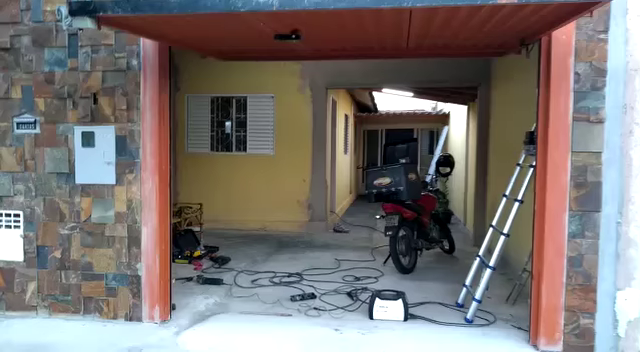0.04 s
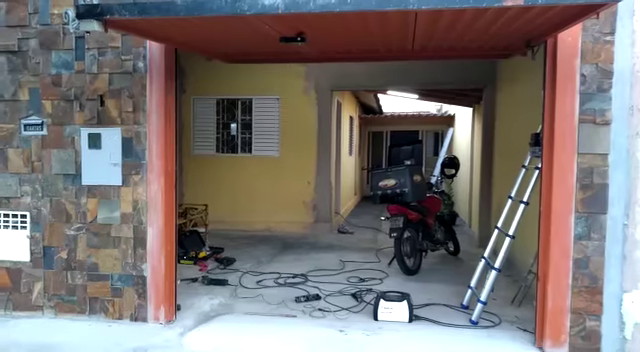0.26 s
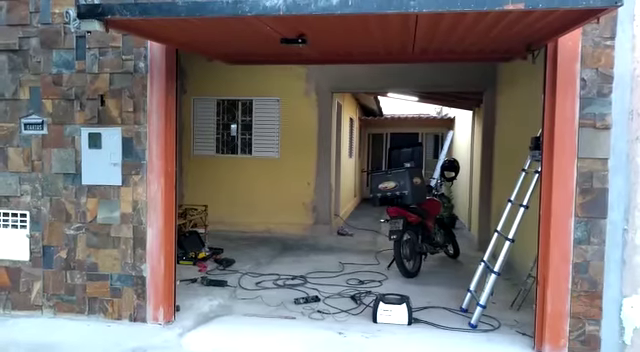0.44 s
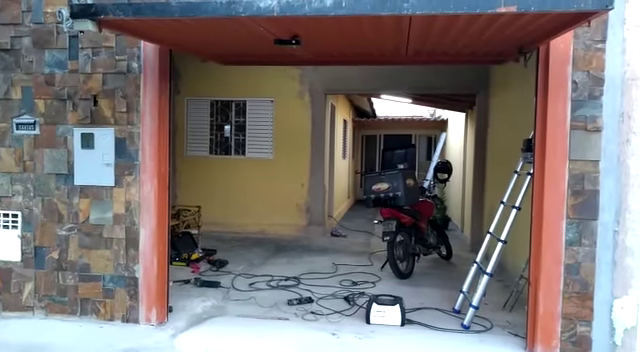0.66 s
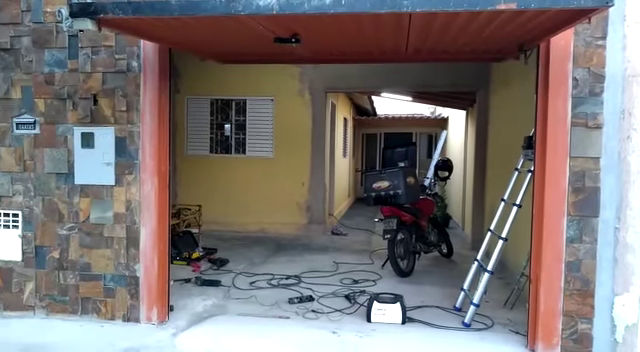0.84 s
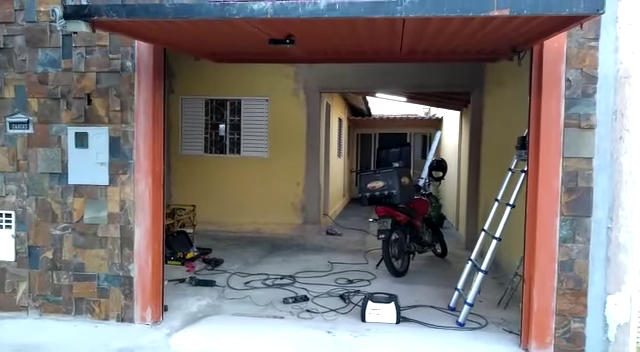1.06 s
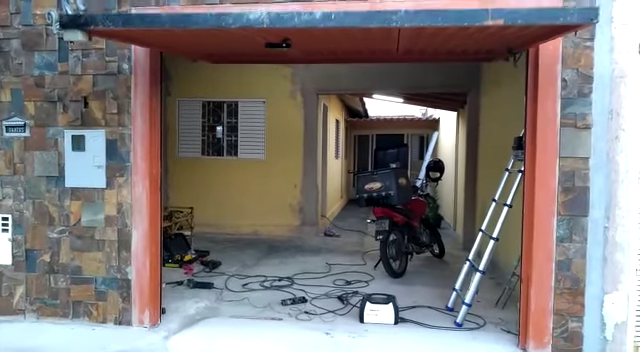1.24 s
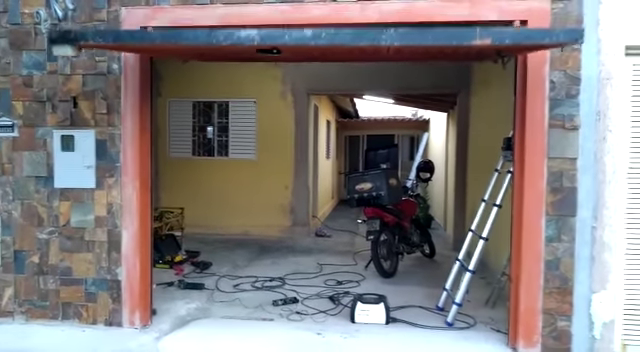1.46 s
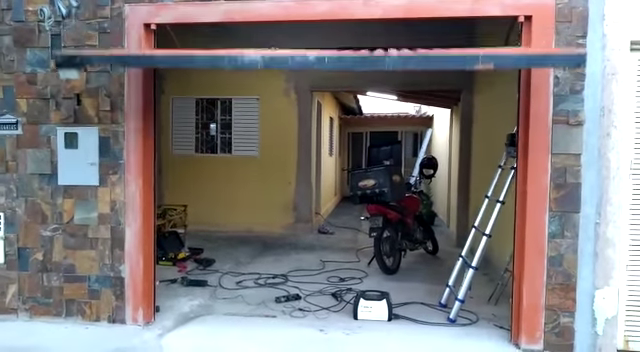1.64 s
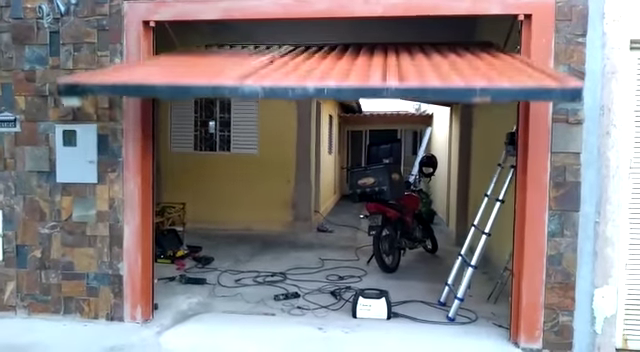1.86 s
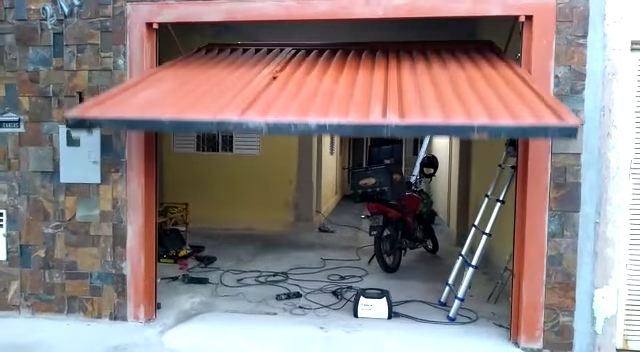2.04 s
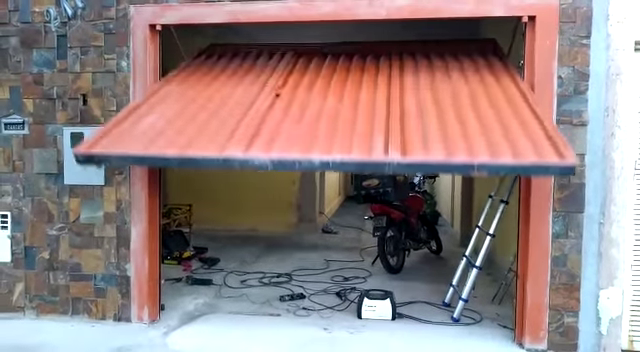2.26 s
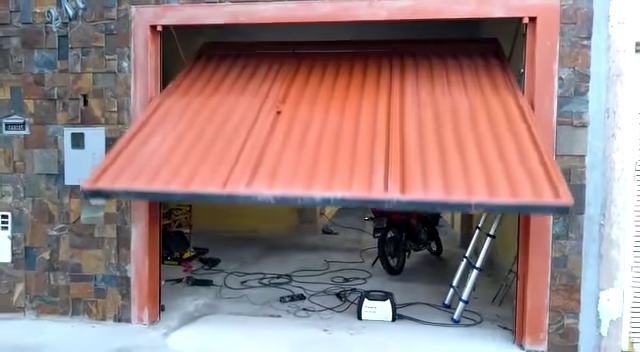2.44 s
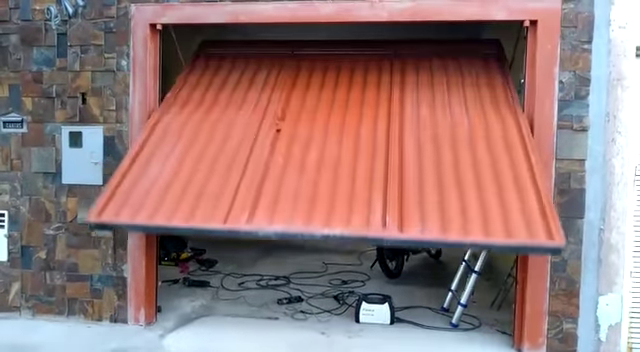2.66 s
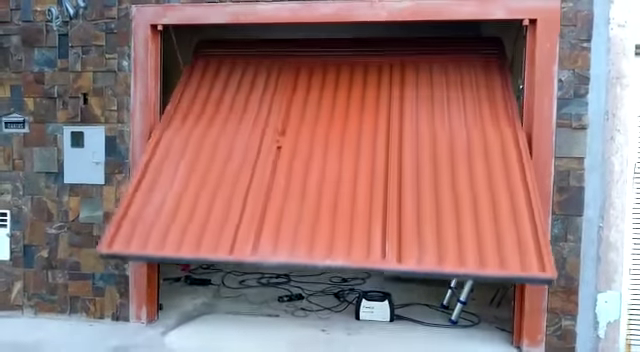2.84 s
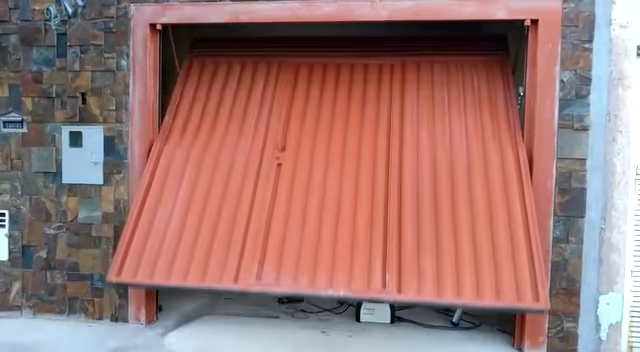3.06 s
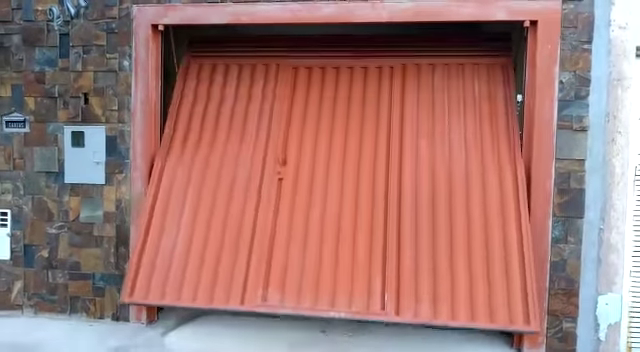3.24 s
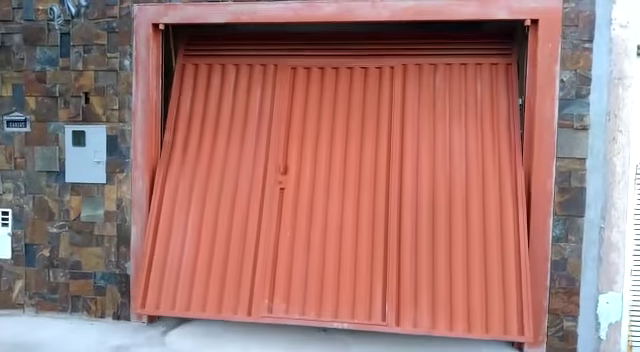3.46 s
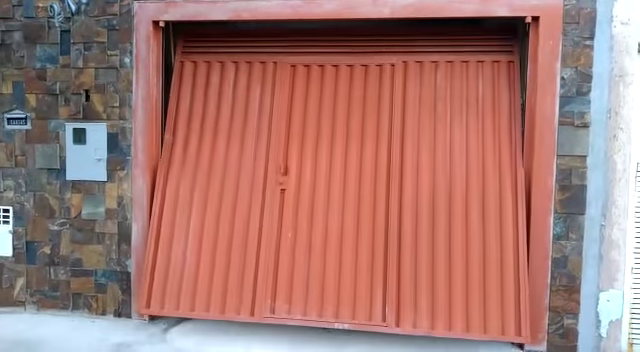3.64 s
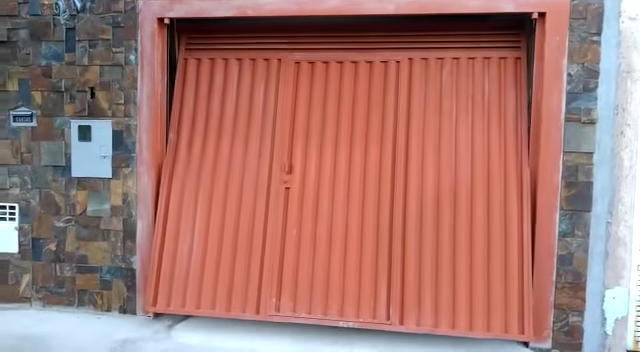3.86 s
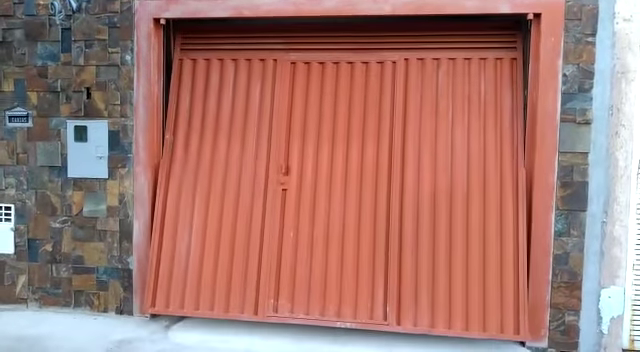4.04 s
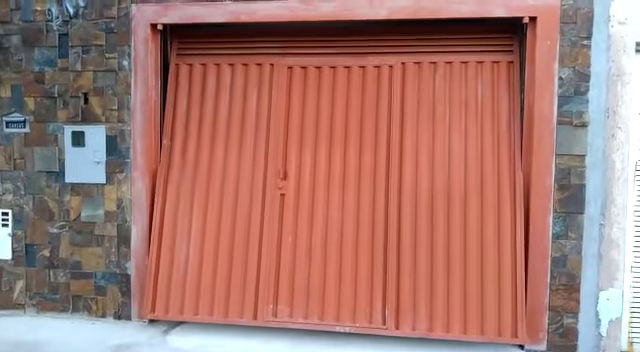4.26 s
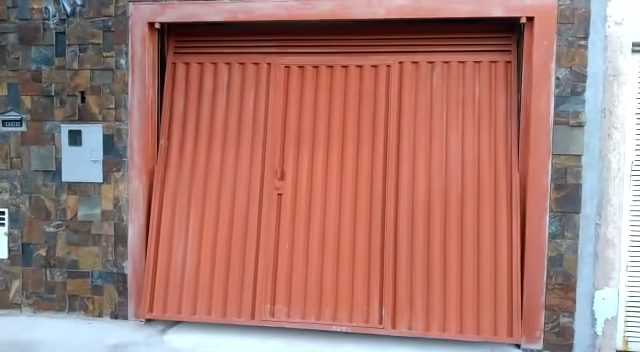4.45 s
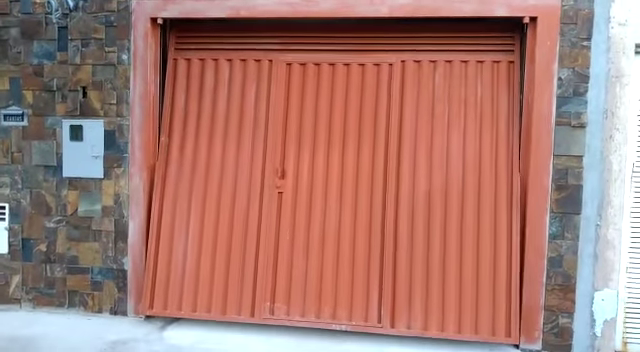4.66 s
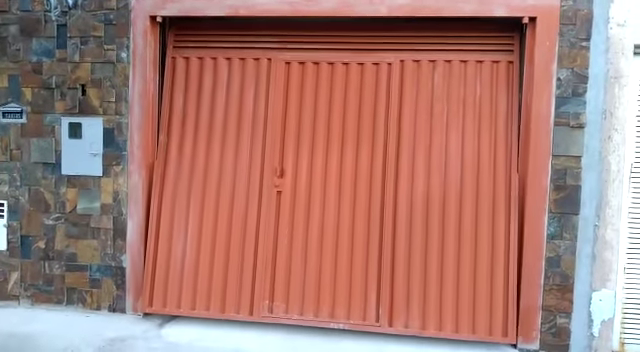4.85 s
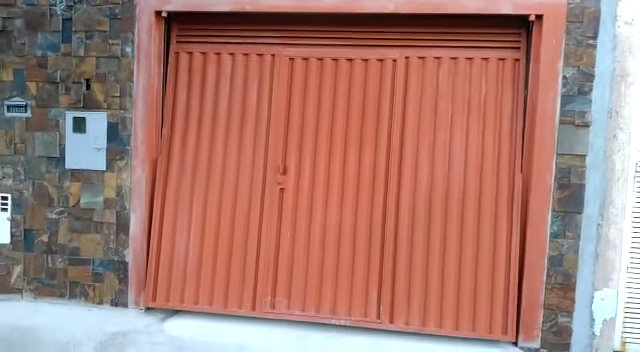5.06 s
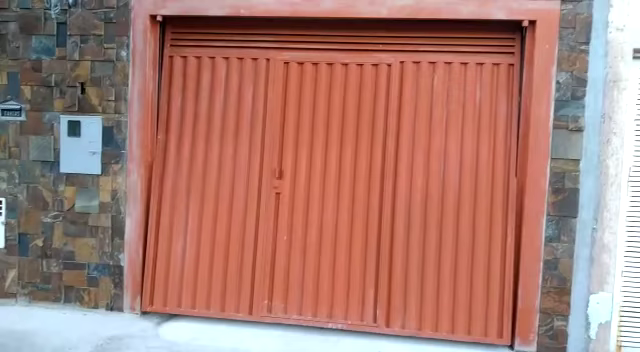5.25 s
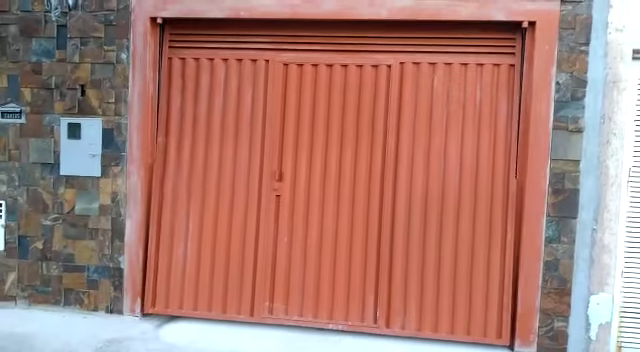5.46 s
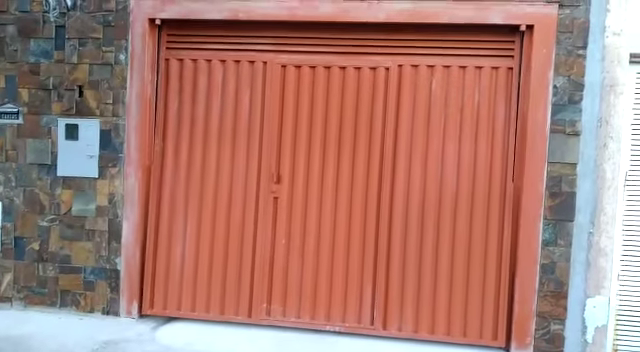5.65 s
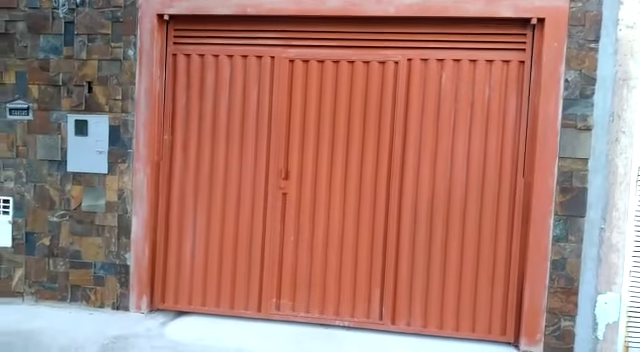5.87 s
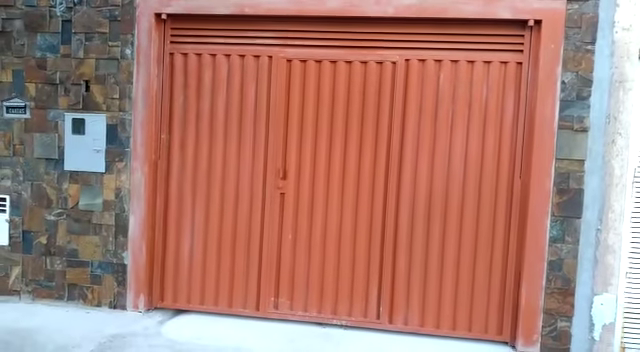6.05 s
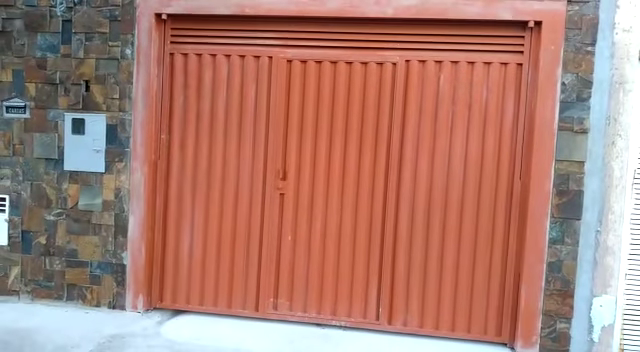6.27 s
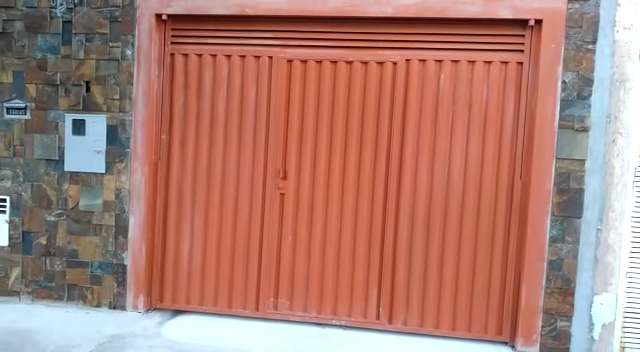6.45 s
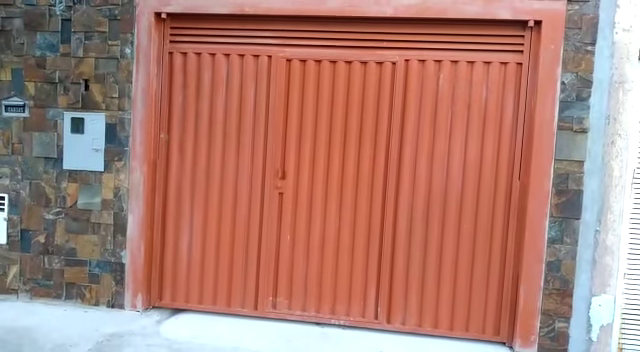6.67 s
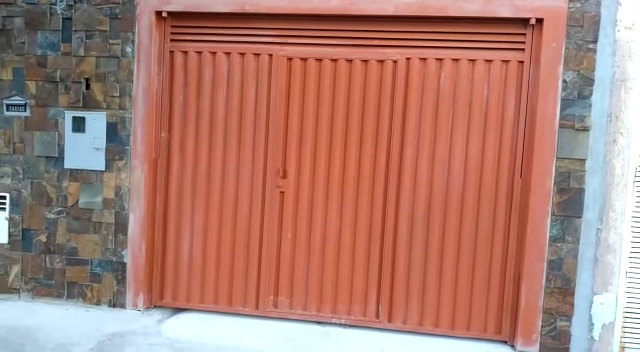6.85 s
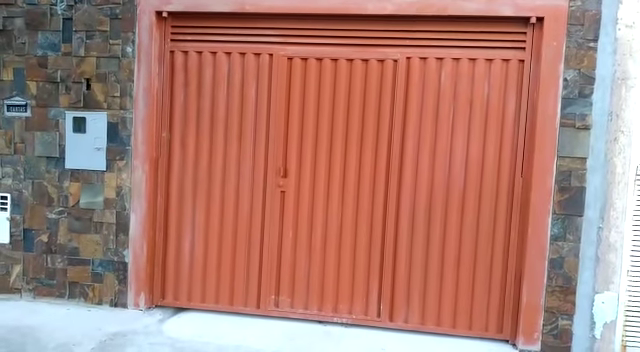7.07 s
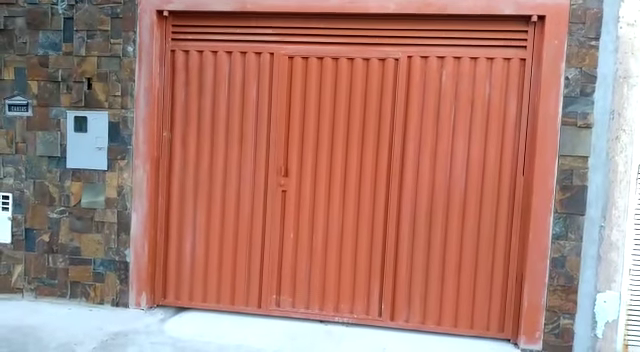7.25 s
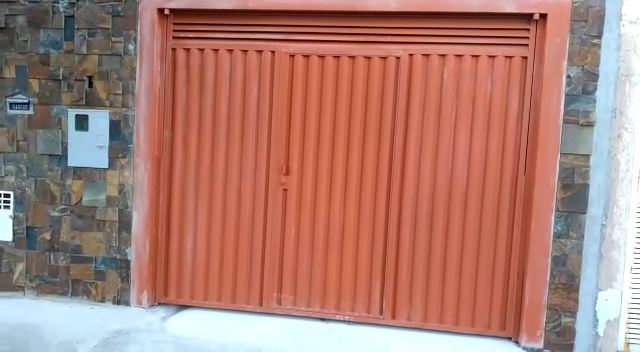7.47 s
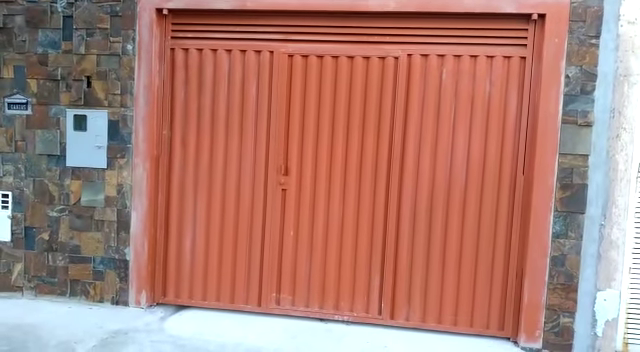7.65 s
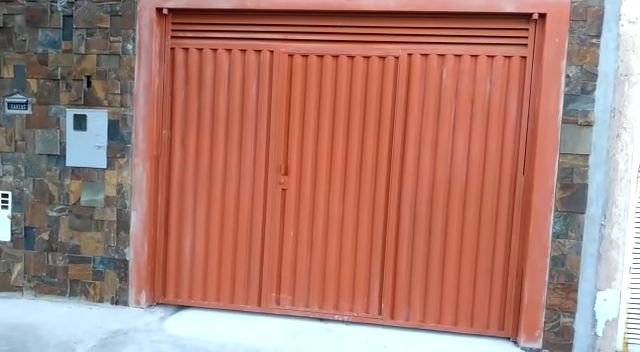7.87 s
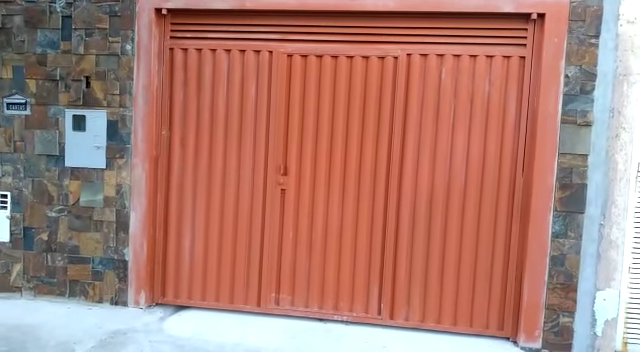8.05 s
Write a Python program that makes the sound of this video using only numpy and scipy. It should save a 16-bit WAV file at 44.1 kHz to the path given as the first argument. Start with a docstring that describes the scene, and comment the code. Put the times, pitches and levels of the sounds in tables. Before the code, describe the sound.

After a tiny silence, low wind gusts thump and pop against one side of a hand-held stereo microphone, over quiet street noise. At about 0.9 s gate pivots begin to hiss and squeal, wavering upward into a piercing thin tone around 1.5 s; a dry tick sounds near 1.4 s. A knock at 1.6 s and another at 2.2 s lead into heavy sheet-metal clanks at 2.4-2.5 s and 3.0 s, over a rolling rumble, a faint high motor whine and brief soft hums. At 3.3-3.9 s come a bang, bright rattles and a short sharp squeak as the gate reaches its frame. From 4 to 5.6 s wind buffeting dominates, with weak knocks. A clank at 5.8 s starts renewed rattling, strong around 6.2-7 s. After a gusty lull, hard clatters hit at 7.6-7.8 s. The garage adds a short, dull echo.

```python
"""By a windy street, a tilting sheet-steel garage gate is driven shut by an inverter-fed motor.
Behind it lie street noise, faint hums and a thin whine; gusts, made of shaped noise, buffet one exposed port.
The pivots hiss (noise) and squeal (wavering partials); the sheet rumbles and clanks, its modes shaken by
random contacts. The two ports of a hand-held recorder are subtracted crosswise into a wide stereo pair."""
import sys
import numpy as np
from scipy import signal
from scipy.fft import rfft, irfft, next_fast_len
from scipy.io import wavfile
from scipy.ndimage import uniform_filter1d

SR = 44100
rng = np.random.default_rng(int(sys.argv[2]) if len(sys.argv) > 2 else 0)


def unload_audio(sound):
    """Save the sound as a 16-bit wav file, at the path given as the first command line argument."""
    columns = np.transpose(np.atleast_2d(sound))
    # keep every value between -1 and 1, then stretch to whole-number steps
    steps = np.round(np.clip(columns, -1, 1) * 32767)
    wavfile.write(sys.argv[1], SR, steps.astype(np.int16))


N = 357651


def from_db(db):
    """Decibels to gain."""
    return 10 ** (np.asarray(db) / 20)


def rms_one(x):
    """Scale to rms 1."""
    return x / np.sqrt(np.mean(x ** 2) + 1e-20)


def in_time(rows):
    """Columns of a table as curves, one value a sample."""
    time_s, *columns = np.transpose(rows)
    return [np.interp(np.arange(N) / SR, time_s, column) for column in columns]


def coloured(x, spectrum):
    """Shape x by a spectrum drawn on a log-frequency axis; rms 1."""
    size = next_fast_len(N)
    table_hz, level_db = np.transpose(spectrum)
    hz = np.arange(size // 2 + 1) * SR / size
    gain = from_db(np.interp(np.log(hz + 1), np.log(table_hz), level_db))
    return rms_one(irfft(rfft(x, size) * gain, size)[..., :N])


def drift(rate_hz):
    """Slow chance: noise through a double one-pole low-pass; spread 1."""
    r = np.exp(-2 * np.pi * rate_hz / SR)
    noise = rng.standard_normal(N + SR)
    return rms_one(signal.lfilter([1], [1, -2 * r, r * r], noise)[SR:])


def contacts(per_s, uneven_db):
    """Random clicks of uneven size and either sign; rms 1."""
    sizes = from_db(uneven_db * np.minimum(rng.exponential(1, N), 4))
    signs = rng.choice([-1, 1], N)
    return rms_one(sizes * signs * (rng.random(N) < per_s / SR))


def evened(x, share):
    """Take a share of the chance swells out of a noise."""
    return rms_one(x / uniform_filter1d(x ** 2, size=1500) ** (share / 2))


RISE_ROUNDING, FALL_ROUNDING = 1.53, 1.23   # exponents of the decibel curve


def swell(start, peak, end, peak_db, fade_db):
    """Samples of an event and its level: fade_db under the peak at the full reach either side."""
    now = slice(round(start * SR), min(round(end * SR), N))
    t = np.arange(now.start, now.stop) / SR
    rise = np.maximum(peak - t, 0) / (peak - start)
    fall = np.maximum(t - peak, 0) / (end - peak)
    return now, peak_db - fade_db * (rise ** RISE_ROUNDING + fall ** FALL_ROUNDING)


def resonator(force, hz, t60, gain):
    """One decaying mode driven by a force, its gain balanced for damping and pitch."""
    r, w = from_db(-60 / (t60 * SR)), 2 * np.pi * hz / SR
    drive = gain * np.sqrt(1 - r * r) * np.sin(w)
    return signal.lfilter([0, drive], [1, -2 * r * np.cos(w), r * r], force)


PATCHY_DB = 3.5   # spread of the band levels


def patchy(x):
    """Narrow bands swell and fade each on their own, as different parts take up the shaking."""
    spectra = signal.stft(x, nperseg=256)[2]
    field = uniform_filter1d(rng.standard_normal(spectra.shape), size=3, axis=0)     # across pitch
    field = uniform_filter1d(uniform_filter1d(field, size=11, axis=1), size=11, axis=1)     # along time
    gain = from_db(PATCHY_DB * rms_one(field))
    return rms_one(signal.istft(spectra * gain, nperseg=256)[1][:N])


# colour of the street noise: freq_hz, relative level_db (per Hz)
STREET_COLOUR = [(40, 6.5), (300, -3), (700, -36), (1700, -28.5), (3000, -38.5), (5300, -43),
                 (10000, -47.5), (14500, -55)]
STREET_DB = -42


def street():
    """Steady street noise, as two unrelated layers of one colour."""
    return from_db(STREET_DB) * coloured(rng.standard_normal((2, N)), STREET_COLOUR)


# short faint hums: start_s, end_s, pitch_hz, level_db (about which it flutters)
HUM_NOTES = [(0.372, 0.437, 970, -63), (0.69, 0.8, 697, -57), (1.244, 1.376, 784, -55),
             (1.45, 1.576, 790, -58), (1.873, 2.154, 508.6, -49), (2.494, 2.893, 366.6, -37)]
HUM_FLUTTER_DB = 2.5


def hums():
    """Slightly unsteady sines that swell and fade."""
    out, t = np.zeros(N), np.arange(N) / SR
    waver, flutter_db = drift(15), HUM_FLUTTER_DB * drift(14)
    for start, end, hz, level_db in HUM_NOTES:
        envelope = np.sin(np.pi * np.clip((t - start) / (end - start), 0, 1)) ** 0.12
        out += from_db(level_db + flutter_db) * envelope * np.sin(2 * np.pi * hz * t + 0.98 * waver)
    return out


# changing breeze on the exposed port: time_s, level_db
BREEZE = [(0.08, -39), (0.6, -26), (0.74, -30), (0.8, -21), (1.0, -41), (1.5, -46), (2.1, -37), (2.6, -44),
          (3.1, -43), (3.5, -38), (4.3, -26), (5.0, -30.5), (5.6, -30.5), (6.3, -21), (6.7, -34.5),
          (7.2, -23), (7.43, -32), (7.7, -27), (7.96, -19.5), (8.1, -21.5)]
# gusts that thump the port: peak_s, peak_db, fall_s, upper_buffeting_db (relative)
GUST_EVENTS = [(0.132, -36.5, 0.064, 11.5), (0.174, -32, 0.018, 11.5), (0.222, -25, 0.018, 9),
               (0.329, -18.5, 0.056, -3.5), (0.264, -20, 0.013, 6), (0.471, -17.5, 0.013, -2.5),
               (0.571, -20.5, 0.08, -2), (0.68, -23, 0.032, 0), (0.842, -15, 0.04, -15),
               (0.982, -27.5, 0.038, 3), (1.068, -31, 0.041, -3), (1.152, -25.5, 0.043, -4),
               (1.29, -18.5, 0.021, -8.5), (1.368, -25, 0.04, -9), (2.162, -26, 0.048, -4),
               (2.692, -37, 0.11, -19), (3.23, -31, 0.026, -15), (3.328, -18, 0.034, -5),
               (3.63, -24, 0.04, -27), (3.88, -21.5, 0.075, -16), (4.138, -18, 0.096, -10),
               (4.452, -15, 0.04, -12), (4.604, -15.5, 0.026, 0.5), (4.822, -15.5, 0.051, -5),
               (4.941, -16, 0.068, -4), (5.173, -16.5, 0.045, 0.5), (5.297, -18.5, 0.019, -3),
               (5.383, -12.5, 0.015, -6.5), (5.519, -23, 0.14, -4), (5.731, -23.5, 0.028, 1),
               (5.893, -15.5, 0.049, -5.5), (6.17, -15.5, 0.051, -10.5), (6.29, -18, 0.038, 1),
               (6.418, -15, 0.019, -23), (6.72, -26, 0.032, -25), (6.958, -18, 0.043, -6),
               (7.091, -19, 0.033, -5.5), (7.31, -13, 0.016, -2.5), (7.511, -15.5, 0.02, -3),
               (7.608, -16, 0.12, -5.5), (7.86, -15.5, 0.058, -1.5)]
# colours of the deep and the upper buffeting: freq_hz, relative level_db (per Hz)
DEEP_COLOUR = [(15, -57), (25, -65.5), (45, -1.5), (70, 4.5), (120, 2), (200, -10.5), (300, -49),
               (500, -83.5)]
EDGE_COLOUR = [(100, -20), (170, 7), (230, 1), (420, -13), (770, -30.5), (1200, -57), (2500, -97)]
GUST_REACH, GUST_FADE_DB = 2, 25   # fall times to either end; loss there
BREEZE_EDGE_DB = -8   # upper part of the breeze, about which it varies
PUSH_SHARPNESS = .05   # lopsidedness of the pressure


def wind():
    """Lumpy pressure from eddies; the upper part comes in shorter bursts."""
    low_power = from_db(in_time(BREEZE)[0]) ** 2
    high_power = low_power * from_db(BREEZE_EDGE_DB + 8.2 * np.tanh(drift(7.6))) ** 2
    for s, peak_db, fall, edge_db in GUST_EVENTS:
        reach = GUST_REACH * fall
        now, level_db = swell(s - reach, s, s + reach, peak_db, GUST_FADE_DB)
        low_power[now] += from_db(level_db) ** 2
        high_power[now] += from_db(level_db + edge_db) ** 2
    deep = evened(coloured(rng.standard_normal(N), DEEP_COLOUR), share=0.86)
    deep = deep * from_db(3.8 * drift(34))
    edge = evened(coloured(contacts(400, 1.93), EDGE_COLOUR), share=0.89)
    edge = edge * from_db(2.0 * np.tanh(drift(28)))
    gust = deep + edge * np.sqrt(high_power / low_power)
    gust = gust * from_db(2.0 * np.tanh(drift(11.0)))     # each eddy is a buffet of its own
    # the added square makes the pushes the sharper
    high_pass = signal.butter(2, 60, "high", fs=SR, output="sos")
    return np.sqrt(low_power) * (gust + PUSH_SHARPNESS * signal.sosfilt(high_pass, gust ** 2))


# single eddies that pop on the exposed port: peak_s, peak_db, pitch_hz
EDDY_POPS = [(0.113, -24.5, 420), (0.171, -18, 328), (0.218, -25, 380), (0.265, -11, 300),
             (0.316, -18, 200), (0.352, -30, 220), (0.494, -25, 328), (0.549, -23, 170), (0.581, -30, 220),
             (0.675, -30, 230), (4.796, -19, 200), (5.188, -18, 330), (5.388, -17, 302), (6.281, -11, 200),
             (7.306, -13, 417)]


def pops():
    """Each pop is one sharp push with a dip either side."""
    t, out = np.arange(N) / SR, np.zeros(N)
    for s, peak_db, hz in EDDY_POPS:
        now = slice(round(s * SR) - SR // 50, round(s * SR) + SR // 50)
        away = np.abs(2 * np.pi * hz * (t[now] - s))
        out[now] += from_db(peak_db) * np.exp(-away / 2) * np.cos(away)
    return out


# small dry ticks close to the exposed port: start_s, envelope peak_db, pitch_hz
DRY_TICKS = [(0.158, -48, 4770), (0.2587, -45, 2300), (0.2977, -43, 2400), (0.313, -47, 2200),
             (7.478, -52, 5200), (1.4137, -31, 2900), (7.5592, -34, 4600)]
TICK_S, TICK_GRIT = .0003, .2   # time to the peak in seconds; share of noise


def ticks():
    """Each tick is a few cycles of a ring, roughened by noise."""
    out, t = np.zeros(N), np.arange(SR // 100) / SR
    envelope = t / TICK_S * np.exp(1 - t / TICK_S)
    for s, peak_db, hz in DRY_TICKS:
        ring = np.sin(2 * np.pi * hz * t) + TICK_GRIT * rng.standard_normal(len(t))
        out[round(s * SR):][:len(t)] += from_db(peak_db) * envelope * ring
    return out


# inverter: time_s, drive_hz, whine_db
INVERTER_DRIVE = [(.6, 6.2, -100), (.8, 12, -80), (1.3, 33, -55), (1.65, 83, -68), (2.2, 180, -66.5),
                  (2.5, 170, -72), (2.9, 135, -70), (3.3, 110, -69), (3.5, 54, -100)]
# tones beside the switching frequency: multiple (of drive_hz), level_db (relative to the whine)
WHINE_SIDE_TONES = [(-5, 0), (-1, -1), (1, 0), (5, -6)]
SWITCHING_HZ, WHINE_BLUR_HZ = 11795, 10
WHINE_HISS_DB, WHINE_HISS_HALF_HZ = -1, 800   # relative level; half the bandwidth


def inverter():
    """Thin, fluttering tones split off the switching frequency and spread with speed, in a haze of hiss."""
    drive_hz, whine_db = in_time(INVERTER_DRIVE)
    tones = np.zeros(N)
    for multiple, level_db in WHINE_SIDE_TONES:
        gain = from_db(level_db + 3.0 * drift(12.0))
        hz = SWITCHING_HZ + multiple * drive_hz + WHINE_BLUR_HZ * drift(60.0)
        tones += gain * np.sin(2 * np.pi / SR * np.cumsum(hz))
    edges_hz = [SWITCHING_HZ - WHINE_HISS_HALF_HZ, SWITCHING_HZ + WHINE_HISS_HALF_HZ]
    band = signal.butter(2, edges_hz, "band", fs=SR, output="sos")
    haze = rms_one(signal.sosfilt(band, rng.standard_normal(N)))
    haze = haze * from_db(WHINE_HISS_DB + 2.0 * drift(8.0))
    return from_db(whine_db) * (tones + haze)


# hiss of the pivots: start_s, peak_s, end_s, peak_db (an end before the peak cuts the rise short)
PIVOT_HISS = [(0.882, 0.953, 3.2, -55), (2.838, 3.39, 3.34, -46.5)]
# colour of that hiss: freq_hz, relative level_db (per Hz)
HISS_COLOUR = [(1500, -31), (2500, -43), (5000, 13), (8000, 3.5), (12000, 10), (14500, 4)]
# stick-slip squeals: start_s, peak_s, end_s, peak_db (each strand, before flutter), first_hz, settled_hz,
# settling_s, first_roughness_hz, settled_roughness_hz, overtones_db (relative, set between partials 2 and 3)
PIVOT_SQUEALS = [(0.852, 0.897, 1.3, -51.5, 10470, 6000, 0.048, 300, 580, -30),
                 (0.928, 1.02, 1.16, -46, 3650, 2347, 0.015, 300, 35, -3),
                 (0.963, 1.125, 1.22, -40.5, 2780, 2934, 0.11, 80, 45, -4),
                 (1.12, 1.17, 1.3, -44, 4650, 5200, .1, 100, 170, -10),
                 (1.16, 1.26, 1.37, -48, 2960, 3237, .1, 110, 160, -4),
                 (1.11, 1.19, 1.36, -39.5, 4300, 7280, .2, 210, 370, -3),
                 (0.95, 1.01, 1.08, -51, 3600, 3480, .05, 120, 90, -12),
                 (0.91, 0.96, 1.1, -47, 5300, 5100, .05, 250, 200, -10),
                 (1.22, 1.366, 1.476, -40, 5760, 7330, 0.07, 200, 80, 6),
                 (1.225, 1.31, 1.39, -37, 7030, 7060, 0.11, 40, 40, -25),
                 (1.31, 1.38, 1.46, -38, 7170, 7235, 0.04, 40, 30, -25),
                 (1.36, 1.47, 1.57, -30, 7260, 7238, 0.041, 44, 5.8, -30),
                 (1.5, 1.565, 1.64, -43, 7236, 7236, 0.1, 5, 5, -40),
                 (1.58, 1.67, 1.86, -50, 7232, 7242, 0.091, 5.1, 6.6, -40),
                 (2.28, 2.385, 2.43, -49, 1950, 3900, 0.18, 45, 45, -24),
                 (3.18, 3.32, 3.42, -61, 14250, 14300, .05, 30, 31, -40),
                 (3.525, 3.55, 3.6, -30, 6800, 6500, 0.03, 90, 60, -10),
                 (3.581, 3.65, 3.89, -42, 6810, 6910, 0.205, 113, 90, -14),
                 (3.54, 3.6, 3.66, -33, 6500, 6950, 0.054, 46, 78, -6.5)]
HISS_FADE_DB, SQUEAL_FADE_DB = 24, 20
PARTIAL_STEP_DB = -2.5   # per partial


def pivots():
    """Slips repeat at the squeal pitch; uneven grip splits it into two wavering strands that flutter."""
    out, hiss = np.zeros(N), patchy(coloured(rng.standard_normal(N), HISS_COLOUR))
    for row in PIVOT_HISS:
        now, level_db = swell(*row, HISS_FADE_DB)
        out[now] += from_db(level_db) * hiss[now]
    slow, fast, flutter = ([drift(rate) for strand in range(2)] for rate in (12.0, 200.0, 40.0))
    for (start, peak, end, peak_db, first_hz, settled_hz, settling,
         first_rough, settled_rough, overtones_db) in PIVOT_SQUEALS:
        now, level_db = swell(start, peak, end, peak_db, SQUEAL_FADE_DB)
        left = np.exp(-np.arange(len(level_db)) / SR / settling)     # pitch and grip settle together
        hz = settled_hz + (first_hz - settled_hz) * left
        rough_hz = settled_rough + (first_rough - settled_rough) * left
        slipping = np.minimum(rough_hz / 50, 1)     # near zero: little flutter, overtones or second strand
        for strand in range(2):
            waver_hz = rough_hz * (.4 * slow[strand][now] + fast[strand][now])
            phase = 2 * np.pi * np.cumsum(hz + waver_hz) / SR
            upper = 0
            for k in range(2, 6):
                partial_gain = from_db(overtones_db + PARTIAL_STEP_DB * (k - 2.5))
                upper = upper + partial_gain * np.sin(k * phase) * (k * hz < SR / 2.5)
            gain = from_db(level_db + 4.0 * slipping * flutter[strand][now]) * slipping ** strand
            out[now] += gain * (np.sin(phase + strand) + slipping ** 2 * upper)
    return out


# strongest modes of the sheet: pitch_hz, level_db, t60_s
STRONG_MODES = [(186.5, -5, 0.34), (628, -11, 0.035), (711.5, -4, 0.0071), (859, -12, 0.03),
                (1012, -23, 0.07), (1284, -6, 0.014)]


def sheet_rings(force, powers):
    """The sheet's strongest modes; each is driven by the force at a power of its own."""
    out = 0
    for k, (hz, level_db, t60) in enumerate(STRONG_MODES):
        out = out + resonator(force * np.sqrt(powers[k]), hz, t60, (-1) ** k * from_db(level_db))
    return out


# hinges and brackets: pitch_hz, level_db (relative), t60_s
BRACKET_MODES = [(1700, -6, .03), (2560, 0, .03), (2890, -1, .025), (3250, -8, .02), (3650, -5, .02),
                 (5000, -14, .015)]
BRACKET_DB = -13


def brackets(force):
    """Loose hinges and brackets ring briefly; which of them takes the knock keeps changing."""
    out = 0
    for hz, level_db, t60 in BRACKET_MODES:
        out = out + resonator(force * from_db(5.0 * drift(8.0)), hz, t60, from_db(BRACKET_DB + level_db))
    return out


def blow(t, peak_db, rise, t60):
    """Power of a burst that swells, then decays."""
    build_up = np.minimum(t / max(rise, 1e-4), 1) ** 2
    decay_db = -60 * np.maximum(t - rise, 0) / max(t60, .01)
    return build_up * from_db(peak_db + decay_db) ** 2


# sheet shaken by rollers and drive: time_s, level_db, rattle_db (loose parts, relative)
ROLLING = [(0.86, -60, -14), (1.1, -47.5, -6), (1.44, -48, -14.5), (2.33, -31, -26.5), (2.55, -29.5, -14),
           (2.78, -33.5, -36), (3.04, -29.5, -30), (3.47, -26.5, -15.5), (5.05, -57, -26),
           (5.63, -58, -27.5), (6.41, -30.5, -13), (6.61, -33.5, -17), (6.79, -21, -27), (6.88, -26, -21),
           (7.13, -36, -23), (7.53, -60.5, -18), (7.71, -27.5, -23), (8.11, -53, -35)]
# blows on the sheet: start_s, body_db, crack_db and sizzle_db (relative), build_up_s, t60_s, ring_hz;
# each layer scales the levels and times by the trims below
BLOWS = [(0.213, -42, -38, -28, 0.0024, 0.014, 560), (0.49, -46, -35, -43, 0.003, 0.21, 717),
         (0.897, -38.5, -37, -9, 0.024, 0.75, 614), (1.631, -20.5, -20, -28, 0.00064, 0.5, 679),
         (2.24, -22.5, -48, -46, 0.0015, 0.5, 729), (2.411, -10.5, -19.5, -24.5, 0.008, 0.08, 746),
         (2.481, -32, -24, -21, 0.015, 0.12, 810), (2.511, -9.5, -20.5, -35, 0.024, 0.26, 636.6),
         (2.724, -28.5, -36, -35, 0.0031, 0.084, 720), (2.822, -23, -26, -38, 0.016, 0.12, 694),
         (2.955, -25, -22, -26, 0.016, 0.3, 824), (2.987, -12, -16, -20, 0.01, 0.096, 756),
         (3.262, -22.5, -14, -21, 0.013, 0.078, 620), (3.335, -11, -29, -42, 0.0078, 0.029, 679),
         (3.357, -24.5, -12, -24, 0.0023, 0.19, 837), (3.432, -20.5, -6, -17, 0.0071, 0.11, 745),
         (3.5, -23, -2, -16.5, 0.0025, 0.22, 1165), (3.655, -25, -8, -16.5, 0.017, 0.24, 1197),
         (3.779, -34.5, -6, -28, 0.0091, 0.81, 815), (3.865, -32.5, -2.5, -14, 0.0036, 0.13, 785),
         (4.131, -29.5, -21.5, -38, 0.0041, 0.69, 737), (4.49, -32.5, -37, -35, 0.0045, 0.19, 682),
         (4.532, -31, -20.5, -37, 0.0062, 0.69, 746), (4.693, -39, -13, -33, 0.00077, 0.35, 545),
         (4.883, -37.5, -20, -40, 0.006, 0.053, 560), (5.621, -39.5, -35, -39, 0.0038, 0.22, 685),
         (5.671, -40, -24, -37, 0.0032, 0.78, 602), (5.836, -15, -19.5, -24.5, 0.0061, 0.15, 747),
         (6.139, -38.5, -13, -19, 0.0033, 0.12, 760), (6.15, -25.5, -28, -34, 0.11, 1, 747),
         (6.221, -22.5, -12.5, -20.5, 0.015, 0.21, 766), (6.32, -23.5, -15, -18.5, 0.02, 0.13, 782),
         (6.357, -20, -14, -27, 0.0057, 0.18, 1123), (6.661, -18.5, -19.5, -40, 0.041, 0.033, 676),
         (6.754, -13, -14, -21, 0.018, 0.15, 760), (6.784, -17, -15, -36, 0.018, 0.1, 619),
         (6.972, -23.5, -13.5, -24, 0.017, 0.32, 790), (7.077, -42.5, -1.5, -38, 0.025, 0.3, 860),
         (7.21, -44.5, -3.5, -38, 0.015, 0.14, 910), (7.364, -41, -14, -36, 0.023, 0.62, 1226),
         (7.557, -31.5, -25, -39, 0.0047, 0.018, 905), (7.631, -14.5, -29, -20, 0.014, 0.14, 994),
         (7.688, -34, -4, -12, 0.018, 0.091, 1030), (7.764, -12.5, -21, -35, 0.0094, 0.21, 834),
         (7.822, -22, -28, -32, 0.019, 0.04, 800)]
# colours of the dense sheet modes, the crack and the sizzle: freq_hz, relative level_db (per Hz)
SHEET_COLOUR = [(40, -41), (100, -4), (200, 1.5), (420, -12), (700, -13.5), (1300, -19), (1800, -24),
                (3000, -35), (6000, -50.5), (14000, -67.5)]
CRACK_COLOUR = [(1200, -15.5), (2000, 7.5), (2800, 0.5), (4000, -2.5), (6500, -13), (9000, -34.5)]
SIZZLE_COLOUR = [(4000, -16), (6500, -1), (9000, 2.5), (12000, -2), (14500, -3)]
ROLL_RING_DB, ROLL_SIZZLE_DB = -21, -15   # relative to the rolling body and to its rattle
RING_DB, RING_REACH_OCTAVES = 1.5, 0.037   # strong modes; how near in pitch a blow excites them
CRACK_SHARE_OF_RISE, CRACK_SHARE_OF_T60, SIZZLE_SHARE_OF_T60 = 0.42, 0.66, 0.58
SING_DB, SING_SHARE_OF_T60, SING_WAVER = -10, 0.4, 1.6   # clear note of the struck panel; waver in radians
BLOW_CUT_HZ, BLOW_BASS_DB = 850, -13.5
CLATTER_DB = 1.8


def gate():
    """Rolling and blows shake the sheet; a blow builds up and dies, and favours modes near its ring pitch."""
    roll_db, rattle_db = in_time(ROLLING)
    body = from_db(roll_db + 2.0 * drift(29.0)) ** 2     # these layers are powers
    crack = from_db(roll_db + rattle_db + 2.5 * drift(10.7)) ** 2
    sizzle = crack * from_db(ROLL_SIZZLE_DB) ** 2
    # as the gate tilts and flexes, other modes take up the rolling
    modes = np.array([body * from_db(ROLL_RING_DB + 4.0 * drift(6.0)) ** 2 for mode in STRONG_MODES])
    struck, sung, waver = np.zeros(N), np.zeros(N), SING_WAVER * drift(34.0)
    mode_hz = np.array(STRONG_MODES)[:, :1]

    for s, body_db, crack_db, sizzle_db, rise, t60, ring_hz in BLOWS:
        first = round(s * SR)
        t = np.arange(min(SR // 2, N - first)) / SR
        now = slice(first, first + len(t))
        sharp_rise = rise * CRACK_SHARE_OF_RISE
        thud = blow(t, body_db - 0.5, rise, t60)
        struck[now] += thud     # powers add
        note = np.sqrt(blow(t, body_db + SING_DB, rise, t60 * SING_SHARE_OF_T60))
        sung[now] += note * np.sin(2 * np.pi * ring_hz * t + waver[now])
        octaves_off = np.log2(mode_hz / ring_hz)
        modes[:, now] += thud * np.exp(-(octaves_off / RING_REACH_OCTAVES) ** 2)
        sharp = blow(t, body_db + 3.0, sharp_rise, t60 * CRACK_SHARE_OF_T60)
        crack[now] += sharp * from_db(crack_db) ** 2
        sizzle[now] += blow(t, body_db + sizzle_db + 0.5, sharp_rise, t60 * SIZZLE_SHARE_OF_T60)

    clatter = from_db(CLATTER_DB * drift(42.0)) ** 2     # parts knock again unevenly while a blow dies
    struck, crack, sizzle = struck * clatter, crack * clatter, sizzle * clatter
    force, grit = contacts(1500, 1.63), contacts(4000, 1.5)
    sheet = coloured(force, SHEET_COLOUR)     # the many modes too close to tell apart
    bass = signal.sosfiltfilt(signal.butter(2, BLOW_CUT_HZ, fs=SR, output="sos"), sheet)
    # hard blows are too brief to move the large panels much
    dense = np.sqrt(body + struck) * (sheet - bass)
    dense += np.sqrt(body + struck * from_db(BLOW_BASS_DB) ** 2) * bass
    bright = np.sqrt(crack) * patchy(coloured(grit, CRACK_COLOUR))
    bright += np.sqrt(sizzle) * patchy(coloured(grit, SIZZLE_COLOUR))
    rings = from_db(RING_DB) * sheet_rings(force, modes)
    return dense + sung + rings + bright + brackets(np.sqrt(crack) * grit)


GARAGE_T60_S, GARAGE_DB, WALL_CUT_HZ = .35, -12, 1550   # t60 holds for the bass; treble dies sooner


def garage(x):
    """Ten feedback delays, duller on every round."""
    size = next_fast_len(N + SR)
    hz = np.arange(size // 2 + 1) * SR / size
    dull = 1 / (1 + 1j * hz / WALL_CUT_HZ)
    response = 0
    for k, lag in enumerate(rng.uniform(.015, .05, 10)):
        loop = from_db(-60 * lag / GARAGE_T60_S) * dull * np.exp(-2j * np.pi * hz * lag)
        response = response + loop / (1 - loop) * (-1) ** k
    return irfft(rfft(x, size) * response, size)[:N]


SHADOW_HZ, SHADOW_DB, BASS_SCATTER_DB = 1400, -3.5, -10
SCATTER_S, SCATTER_CUT_HZ = .06, 13000   # decay time constant; treble limit


def shadowed_port(sound, street_shared, street_second_port):
    """The hand blocks direct treble, which arrives by scatter from nearby walls; bass passes round it."""
    edge = signal.butter(3, SHADOW_HZ, fs=SR, output="sos")
    arriving = sound + street_shared
    low = signal.sosfiltfilt(edge, arriving)
    reflected = from_db(SHADOW_DB) * (arriving - low) + from_db(BASS_SCATTER_DB) * low
    scatter = rng.standard_normal((3, SR // 5)) * np.exp(-np.arange(SR // 5) / SR / SCATTER_S)
    scatter = scatter / np.sqrt(np.sum(scatter ** 2))
    scatter = signal.lfilter(*signal.butter(1, SCATTER_CUT_HZ, fs=SR), scatter)
    sway = np.array([drift(1.5) for path in scatter])     # the hand moves: the wall echoes keep changing
    sway = np.sqrt(3) * sway / np.sqrt(np.sum(sway ** 2, axis=0))
    echoes = np.sum(sway * signal.fftconvolve(reflected[None], scatter)[:, :N], axis=0)
    # street hiss differs from port to port
    street_hiss = street_second_port - signal.sosfiltfilt(edge, street_second_port)
    return low + echoes + from_db(SHADOW_DB) * street_hiss


def scene():
    """Pressure at the two ports: the first takes the wind, pops and ticks; the second is shadowed."""
    sound = gate() + pivots() + inverter() + hums()
    street_shared, street_second_port = street()
    sound = sound + from_db(GARAGE_DB) * garage(sound)
    shadowed = shadowed_port(sound, street_shared, street_second_port)
    exposed = sound + street_shared + wind() + pops() + ticks()
    return np.array([exposed, shadowed])


PORT_LAG_S, CROSS_CUT_HZ = .000465, 8000
CROSS_TO_LEFT, CROSS_TO_RIGHT = 0.74, 0.71
START_S, OPENING_S = 0.073, 0.042
BASS_CUT_HZ, CUTOFF_HZ = 38, 14750
OVERLOAD = .65   # ceiling of the soft clipping


def record(dry):
    """Each channel is one port minus the other, delayed and dulled; fades in after a silence; top cut."""
    size = next_fast_len(N + SR // 10)
    hz = np.arange(size // 2 + 1) * SR / size
    padded = np.pad(dry, ((0, 0), (0, size - N)), "reflect")
    cross = np.exp(-2j * np.pi * hz * PORT_LAG_S) / np.sqrt(1 + (hz / CROSS_CUT_HZ) ** 4)
    late = irfft(rfft(padded) * cross, size)[:, :N]
    pair = np.array([dry[0] - CROSS_TO_LEFT * late[1], dry[1] - CROSS_TO_RIGHT * late[0]])
    pair *= np.clip((np.arange(N) / SR - START_S) / OPENING_S, 0, 1)
    pair = signal.sosfilt(signal.butter(2, BASS_CUT_HZ, "high", fs=SR, output="sos"), pair)
    pair = OVERLOAD * np.tanh(pair / OVERLOAD)     # loud gusts are rounded
    return signal.sosfilt(signal.cheby2(16, 80, CUTOFF_HZ, fs=SR, output="sos"), pair)


dry = scene()
out = record(dry)
unload_audio(out)
```